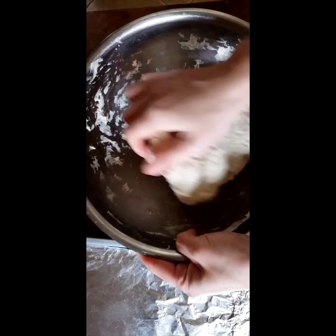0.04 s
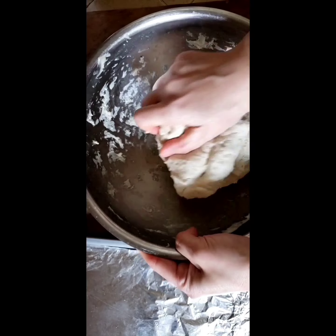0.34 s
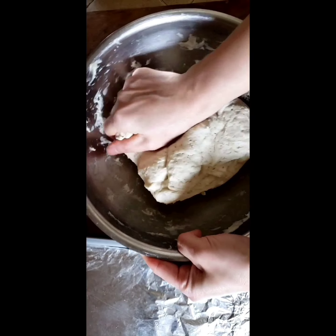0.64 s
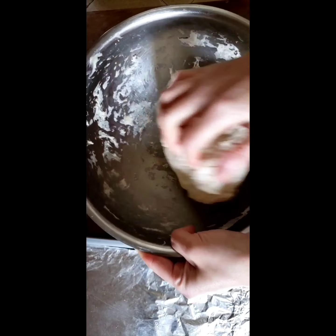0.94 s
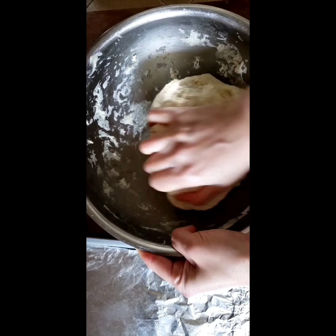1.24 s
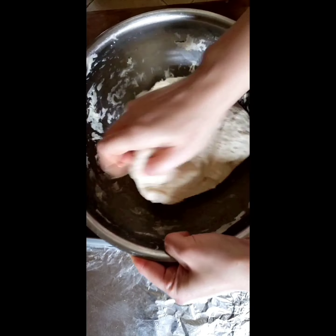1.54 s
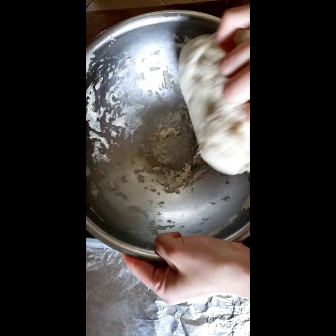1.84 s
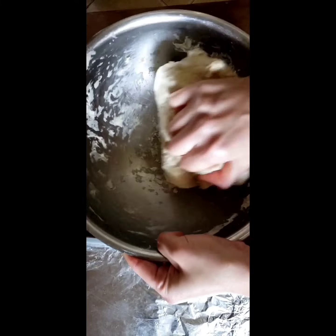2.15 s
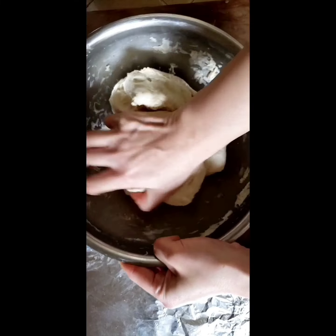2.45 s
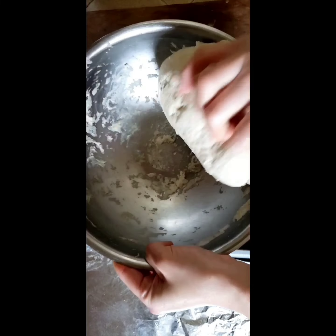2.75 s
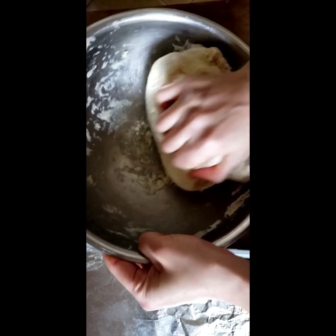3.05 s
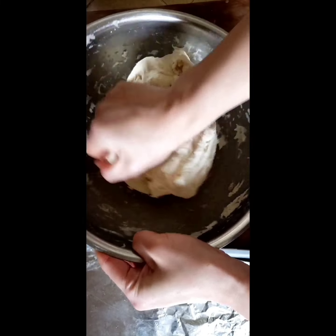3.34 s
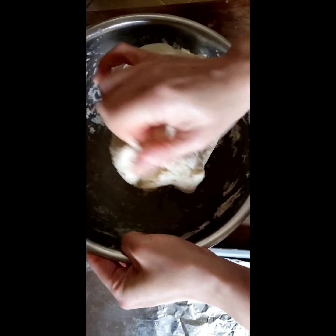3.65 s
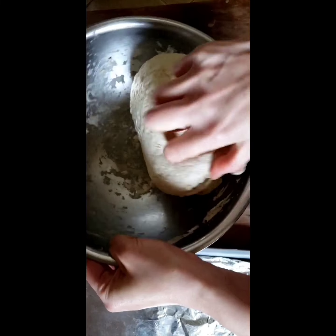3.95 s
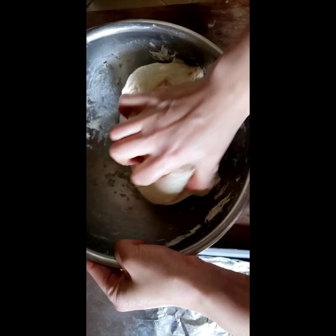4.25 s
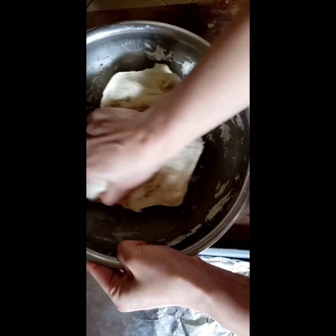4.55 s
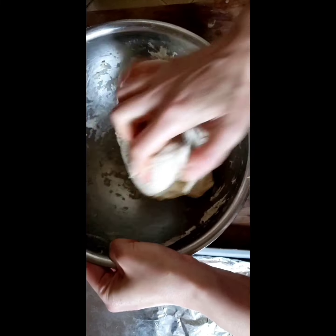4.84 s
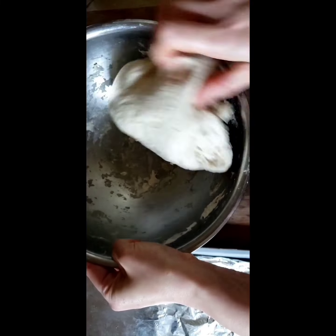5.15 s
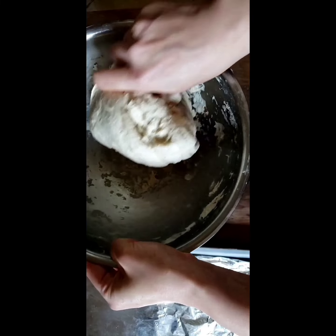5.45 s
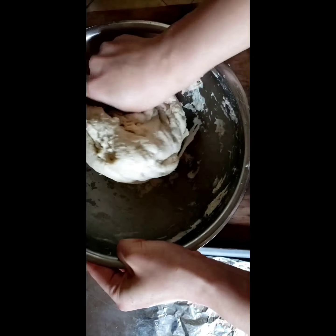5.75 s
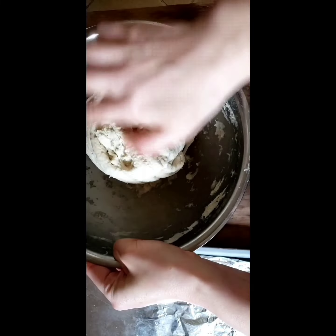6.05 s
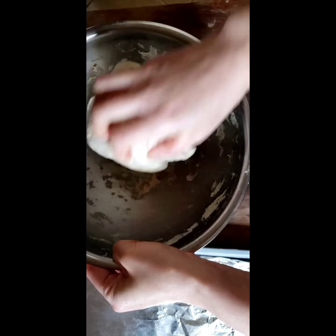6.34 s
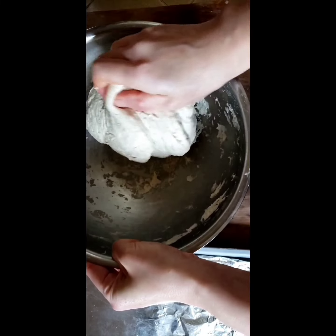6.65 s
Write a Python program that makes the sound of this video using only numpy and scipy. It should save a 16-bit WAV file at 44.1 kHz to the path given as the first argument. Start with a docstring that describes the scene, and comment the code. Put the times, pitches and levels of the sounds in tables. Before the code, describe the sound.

A steel bowl rocks, clanks and thumps on a kitchen counter as a hand pushes and rubs soft dough around inside it.

```python
"""Soft rubbing and a low rumble, close by: a hand kneads dough in a steel bowl on a floury wooden counter.
Strokes drag the dough over floury steel; damp skin and dough stick, slip and squeak.
Pushes tip the bowl: the wall taps as it rocks, the base knocks down and rings, the counter thumps.
Trapped air pops and whistles faintly. A faint kitchen drone lies underneath."""
import sys
import numpy as np
from scipy import signal
from scipy.fft import rfft, irfft, next_fast_len
from scipy.io import wavfile
from scipy.ndimage import uniform_filter1d, map_coordinates

SR = 44100
rng = np.random.default_rng(int(sys.argv[2]) if len(sys.argv) > 2 else 0)


def int16_out(signal):
    """Quantize to a 16-bit WAV file."""
    q = np.round(np.clip(np.atleast_2d(signal).T, -1, 1) * 32767)
    wavfile.write(sys.argv[1], SR, q.astype(np.int16))


N = 304290
T = np.arange(SR * 3 // 5) / SR  # time axis of one impact, s

# hand weight on the dough: t/s, level/dB
HAND_PRESSURE = [(0, -63), (.25, -60), (.36, -49.5), (.8, -51), (1.35, -54.5), (1.68, -50), (2.05, -50),
                 (2.65, -54), (3.0, -49.5), (3.55, -55), (4.15, -50.5), (4.5, -68), (4.8, -59.5),
                 (5.2, -54), (5.42, -63.5), (5.7, -56.5), (6.0, -62.5), (6.9, -61)]
# slides over floury steel: t/s, length/s, skin/dB, flour/dB, scrape/dB
HAND_STROKES = [(.44, 0.062, -51.5, -50.5, -50.5), (0.575, 0.14, -59, -66.5, -54),
                (0.908, 0.029, -49, -48, -51.5), (0.993, 0.3, -56.5, -55, -53.5),
                (1.251, 0.14, -50, -50, -50), (1.464, 0.068, -56, -55.5, -68), (1.697, 0.47, -55, -54, -62),
                (1.824, 0.19, -53, -51, -45), (2.445, 0.27, -60, -65.5, -60),
                (2.682, 0.1, -63, -56.5, -61.5), (2.812, 0.19, -63.5, -65, -58),
                (2.955, 0.076, -49.5, -49, -45), (3.286, 0.041, -57.5, -68, -52.5),
                (3.44, 0.39, -73.5, -59.5, -76), (3.631, 0.22, -59, -59.5, -55),
                (3.887, 0.052, -52, -45, -52), (4.606, .06, -66, -67, -62.5),
                (4.843, 0.11, -60, -56.5, -62), (4.966, 0.15, -60.5, -59, -54.5),
                (5.136, 0.13, -57, -55.5, -54), (5.342, 0.041, -67, -63, -71.5),
                (5.535, 0.16, -70, -75, -63.5), (6.189, 0.22, -61, -59, -62),
                (6.774, 0.043, -59, -50, -58.5)]
# stick-slip: t/s, length/s, level/dB, f/Hz
DOUGH_SQUEAKS = [(0.193, 0.087, -68, 3400), (0.31, 0.057, -50, 158), (0.296, 0.048, -56, 403),
                 (0.92, 0.022, -45.5, 330), (2.85, 0.12, -51.5, 167), (1.869, 0.018, -40, 2100),
                 (2.47, 0.061, -59, 2680), (2.99, 0.039, -41, 760), (3.835, 0.024, -49, 754),
                 (5.08, 0.028, -53, 1080), (5.145, 0.039, -55, 830), (5.533, 0.066, -50.5, 173),
                 (5.58, 0.069, -62.5, 670), (6.385, 0.033, -59, 6100)]
# bowl rocks back on its wall: t/s, level/dB, tilt/(dB/oct), contact/s
WALL_TAPS = [(0.611, -27.5, 2.5, 0.0025), (1.031, -39, -3, 0.0058), (1.521, -37.5, 4, 0.0048),
             (1.669, -39, 1, 0.0035), (1.817, -35.5, -3.5, 0.0048), (1.974, -35, 1, 0.003),
             (2.3078, -32.5, 1.5, 0.0017), (2.775, -36, 3, 0.008), (2.907, -44, -6, 0.0018),
             (3.251, -33.5, 0.5, 0.0023), (3.646, -34, -2, 0.012), (4.096, -19, -5.5, .0015),
             (4.578, -41, 2, 0.0021), (4.951, -46.5, 0.5, .002), (5.699, -37.5, 2, .0012),
             (6.191, -49.5, -4, .008)]
# loaded base lands: t/s, level/dB, tilt/(dB/oct), treble edge/Hz, wall peak/Hz, shudder/dB, thump/dB
BASE_KNOCKS = [(1.057, -31.5, -2.5, 696, 141, 4, -30.5), (1.2653, -21.5, -0.5, 8800, 1300, -0.5, -32),
               (1.2888, -26, 0.5, 3030, 1390, 5, -28), (1.8379, -30.5, -2, 4970, 425, 2, -25),
               (1.9864, -21, -0.5, 4760, 1870, 2, -31), (2.733, -44, -1.5, 1200, 292, 4, -60),
               (2.804, -36.5, -9, 1200, 160, -6, -36.5), (3.037, -36, 5, 7000, 1500, 6, -62),
               (3.0725, -16.5, -0.5, 7100, 1530, -0.5, -52), (3.101, -24, 3.5, 2300, 174, 3.5, -24),
               (3.67, -34.5, -4.5, 2000, 386, 9.5, -27.5), (3.9457, -11, -1, 9450, 1020, 4.5, -28),
               (3.9844, -19, -0.5, 7190, 1170, 9, -22.5), (4.097, -18.5, 1, 2000, 366, 11, -16),
               (4.987, -35, 0, 4000, 400, 30, -32), (5.8445, -35, 0, 1480, 257, -5.5, -44.5),
               (6.224, -42.5, 0, 2690, 457, 24, -32), (6.818, -41.5, -1.5, 2000, 455, 2, -34)]
# air pockets burst: t/s, level/dB, f/Hz
AIR_POPS = [(1.1027, -28, 6080), (1.422, -45, 12000), (3.362, -52.5, 12400), (4.169, -48, 11680)]
# air squeezed out: t/s, length/s, level/dB, start f/Hz, end f/Hz
AIR_WHISTLES = [(2.385, .05, -65, 12000, 14300), (2.54, .058, -57, 14300, 12100),
                (2.622, .035, -63, 12700, 12150)]
# steel bowl modes: f/Hz, level/dB, nominal t60/s
BOWL_MODES = [(257, -4, .55), (338, -5, .25), (356, -4, .35), (407, -5, .35), (489, -2, .3), (557, -5, .35),
              (765, -5, .55), (866, -12, .35), (948, -7, .35), (1104, 4, .4), (1280, -9, .3),
              (1353, -12, .3), (1710, -15, .2), (1922, -14, .15), (2304, -23, .2), (2990, -17, .12),
              (4800, -12, .09), (4856, -14, .2), (5507, -26, .15), (6788, -26, .15)]
# counter rumble: f/Hz, level/dB
COUNTER_SPECTRUM = [(20, -25.5), (48, -9), (68, 0.5), (100, -5), (125, -6.5), (162, -5.5), (200, -22),
                    (330, -17), (600, -25.5), (1500, -68)]
# bowl scrape: f/Hz, level/dB
SCRAPE_SPECTRUM = [(100, -32.5), (250, -3.5), (500, -2), (660, 0), (790, -2.5), (1150, -1.5), (1500, -5),
                   (2100, -9), (2700, -10.5), (4000, -19), (8000, -33.5)]
# skin rub: f/Hz, level/dB
SKIN_SPECTRUM = [(500, -35), (1800, -8), (2700, -4), (3800, -2.5), (5200, 0), (7200, -0.5), (8800, -16.5),
                 (15000, -27.5)]
# flour hiss: f/Hz, level/dB
FLOUR_SPECTRUM = [(1000, -34), (4000, -12), (7000, -2), (8700, -6), (10500, 1), (13000, 5.5), (15000, -3)]
# kitchen drone: f/Hz, level/dB
DRONE_SPECTRUM = [(12, -48.5), (20, -26.5), (59, -3.5), (97, -19.5), (160, -2.5), (223, -34.5), (294, -15),
                  (540, -14.5), (656, -39.5), (1170, -49.5), (5690, -53.5), (6720, -26), (8380, -44),
                  (11100, -31), (15000, -56.5)]
# struck wall: f/Hz, level/dB
WALL_SPECTRUM = [(60, -32), (250, -17.5), (355, -7), (470, -30.5), (630, -5.5), (765, 5.5), (900, -10.5),
                 (1110, 5), (1400, -8.5), (2600, -9.5), (3800, -19.5), (6500, -27), (8800, -42.5),
                 (15000, -39.5)]
# struck base: f/Hz, level/dB
BASE_SPECTRUM = [(40, -21.5), (130, 1), (195, -1), (270, -1.5), (560, -2), (690, -3), (830, -5),
                 (1750, -9.5), (2400, -17), (4200, -24.5), (4900, -16.5), (7000, -18.5), (8800, -30),
                 (15000, -27.5)]
# uneven radiation of the bowl: f/Hz, left minus right/dB
BOWL_BALANCE = [(100, 0.5), (250, 0), (520, 3), (1050, 0), (1900, 2), (5000, 2.5), (9000, 1.5)]
# left-right likeness: f/Hz, coherence/1
COHERENCE = [(100, 0.96), (300, 0.83), (550, 0.76), (1000, 0.14), (2000, .1), (5000, 0.078), (12000, 0)]
# kitchen reverberation: f/Hz, t60/s
ROOM_DECAY = [(100, 0.57), (400, 0.26), (1500, 0.3), (5000, 0.46), (12000, 0.083)]


def amp(db):
    """dB to gain."""
    return 10 ** (np.asarray(db) / 20)


def unit(x):
    """Scale to rms 1."""
    return x / np.sqrt(np.mean(x ** 2) + 1e-20)


def unit_energy(x):
    """Scale to the energy of 10 ms at rms 1."""
    return unit(x) * np.sqrt(SR / 100 / x.shape[-1])


def along(points, hz):
    """Interpolate (f/Hz, value) points on a log axis."""
    points_hz, values = np.transpose(points)
    return np.interp(np.log(hz + 1), np.log(points_hz + 1), values)


def resonance(hz, centre_hz, width):
    """Peak of height 1; width relative to the centre."""
    return 1 / (1 + ((hz - centre_hz) / (width * centre_hz)) ** 2)


def add(track, start_s, sound):
    """Mix in at start_s."""
    part = track[:, round(start_s * SR):][:, :sound.shape[-1]]
    part += sound[..., :part.shape[-1]]


def wobble(rate_hz):
    """Random knots joined by lines."""
    knots = rng.standard_normal(int(N * rate_hz / SR) + 4)
    return map_coordinates(knots, [np.arange(N) * rate_hz / SR], order=1)


def filtered(x, response):
    """FFT filter by response(hz)."""
    n = x.shape[-1]
    size = next_fast_len(n + SR // 10)
    return irfft(rfft(x, size) * response(np.fft.rfftfreq(size, 1 / SR)), size)[..., :n]


def struck(x, gain, size=4096):
    """Drive a minimum-phase body of magnitude gain(hz)."""
    cepstrum = irfft(np.log(np.maximum(gain(np.fft.rfftfreq(size, 1 / SR)), 1e-6)))
    cepstrum[1:size // 2] *= 2
    cepstrum[size // 2 + 1:] = 0
    impulse_response = irfft(np.exp(rfft(cepstrum)))
    return signal.fftconvolve(x, impulse_response[None], axes=1)[:, :x.shape[-1]]


def spread_rad(hz):
    """Mid-side angle for the coherence at hz."""
    return np.arccos(np.clip(along(COHERENCE, hz), -1, 1)) / 2


def diffuse(n):
    """White stereo noise: coherent bass, unrelated treble."""
    weights = lambda hz: np.array([np.cos(spread_rad(hz)), np.sin(spread_rad(hz))])
    mid, side = filtered(rng.standard_normal((2, n)), weights)
    return np.array([mid + side, mid - side])


def rush(spectrum, patchy_db):
    """Coloured stereo noise, rms 1, with random time-frequency patches of gain."""
    bins = signal.stft(diffuse(N), nperseg=1024)[2]
    patches = uniform_filter1d(rng.standard_normal(bins.shape[1:]), size=5, axis=0)
    patches = uniform_filter1d(patches, size=6, axis=1)
    noise = signal.istft(bins * amp(patchy_db * unit(patches)), nperseg=1024)[1][:, :N]
    return unit(filtered(noise, lambda hz: amp(along(spectrum, hz))))


def friction(push_db, attack_tau_s=0.012, release_tau_s=0.042, arch_db=1.5):
    """Skin, flour and scrape gains: light cling following the push, plus arched strokes."""
    t = np.arange(N) / SR
    cling_db = [[-17.5], [-15.5], [-16]]
    power = (amp(cling_db) * amp(push_db)) ** 2
    for start_s, length_s, *levels_db in HAND_STROKES:
        before = np.maximum(start_s - t, 0) / attack_tau_s
        after = np.maximum(t - start_s - length_s, 0) / release_tau_s
        fade = np.exp(-np.minimum(before + after, 20))
        position = np.clip(2 * (t - start_s) / length_s - 1, -1, 1)
        arch = amp(arch_db * (.5 - position ** 2))
        power += np.outer(amp(levels_db), arch * fade) ** 2
    return np.sqrt(power)


def crackle(rate_hz):
    """Threads of wet dough snap at random times and sizes."""
    impulses = (rng.random(N) < rate_hz / SR) * rng.standard_normal(N)
    snap = rng.standard_normal((2, 256)) * np.exp(-T[:256] / 0.0013)
    snaps = signal.fftconvolve(impulses[None], snap, axes=1)[:, :N]
    return unit(filtered(snaps, lambda hz: amp(along(SKIN_SPECTRUM, hz))))


def kneading():
    """Pressure rumbles through the counter; steel, skin and flour rub in tiny slips."""
    push_db = np.interp(np.arange(N) / SR, *np.transpose(HAND_PRESSURE))
    skin_gain, flour_gain, scrape_gain = friction(push_db)
    slips_db = 1.2 * wobble(rate_hz=45) + 1.2 * wobble(rate_hz=600)
    push = amp(push_db) * rush(COUNTER_SPECTRUM, patchy_db=1.0)
    scrape = scrape_gain * rush(SCRAPE_SPECTRUM, patchy_db=5.0)
    skin = skin_gain * (rush(SKIN_SPECTRUM, patchy_db=5.5) + amp(-15) * crackle(rate_hz=100))
    flour = flour_gain * rush(FLOUR_SPECTRUM, patchy_db=.3) * amp([[-.9], [.9]])  # slightly right
    return push + amp(slips_db) * (scrape + skin) + amp(.6 * slips_db) * flour


def drone():
    """Faint kitchen background."""
    return amp(-65) * rush(DRONE_SPECTRUM, patchy_db=3.0)


def squeaks():
    """Damp skin and dough stick and slip on steel: narrow noise bands with soft ends."""
    out = np.zeros((2, N))
    for start_s, length_s, db, pitch_hz in DOUGH_SQUEAKS:
        n = round(length_s * SR)
        band = unit(filtered(diffuse(n), lambda hz: resonance(hz, pitch_hz, width=0.156)))
        add(out, start_s, amp(db) * band * signal.windows.tukey(n, 0.33))
    return out


def chatter(t60_s, rise_s):
    """Dense, damped shudder of thin steel under dough."""
    return unit_energy(diffuse(len(T)) * amp(-60 * T / t60_s) * (1 - np.exp(-T / rise_s)))


def room_tail():
    """Fresh kitchen reverberation; each band has its own decay."""
    hz, t, bins = signal.stft(diffuse(len(T)), SR, nperseg=256)
    decay = amp(-60 * t / along(ROOM_DECAY, hz)[:, None])
    return unit_energy(signal.istft(bins * decay, SR, nperseg=256)[1][:, :len(T)])


def ring(damping, settle_s):
    """Bowl modes at random strengths, phased apart left and right, choked by settling dough."""
    hz, db, t60_s = np.transpose(BOWL_MODES)[:, :, None]
    strength = amp(db + 1.2 * rng.standard_normal(hz.shape))
    offset_rad = spread_rad(hz) * rng.choice([-1, 1], hz.shape)
    modes = strength * np.exp((2j * np.pi * hz - np.log(1000) * damping / t60_s) * T)
    pair = np.array([(modes * np.exp(1j * side * offset_rad)).imag.sum(0) for side in (1, -1)])
    attack = 1 - np.exp(-T / 0.00043)
    choke = np.exp(-(T / settle_s) ** 2)
    return unit_energy(pair * attack * choke)


def taps():
    """Light wall contacts buzz without a thump; longer ones scuff."""
    out = np.zeros((2, N))
    for start_s, db, tilt_db_oct, contact_s in WALL_TAPS:
        contact = chatter(t60_s=.027 + 9 * contact_s, rise_s=contact_s) + amp(-9.5) * room_tail()
        wall = lambda hz: amp(along(WALL_SPECTRUM, hz) + tilt_db_oct * np.log2((hz + 200) / 1200))
        buzz = unit_energy(struck(contact, wall))
        add(out, start_s, amp(db) * (buzz + amp(-12) * ring(damping=2.1, settle_s=0.022)))
    return out


def slap(dispersion):
    """Bending waves in steel carry the treble ahead of the bass."""
    impulse = signal.unit_impulse(len(T))
    return unit_energy(filtered(impulse, lambda hz: np.exp(-1j * dispersion * np.sqrt(hz))))


def knocks(free_ring_db=-1, held_ring_db=-19, jump_db=-12, ring_slope=1.8):
    """The base slaps the counter; hard knocks free the bowl from the hand, so it rings more."""
    out = np.zeros((2, N))
    for start_s, db, tilt_db_oct, edge_hz, wall_hz, shudder_db, thump_db in BASE_KNOCKS:
        # many contact points within a few ms
        landing = unit_energy(slap(dispersion=.2) + amp(-1) * chatter(t60_s=.018, rise_s=.0005))
        contact = unit_energy(landing + amp(shudder_db) * chatter(t60_s=0.079, rise_s=0.0006))
        contact += amp(-10.5) * room_tail()

        def body(hz):
            """Base response; the dough's position sets which part of the wall resonates."""
            wall_db = 9 * resonance(hz, wall_hz, width=0.13)
            tilt_db = tilt_db_oct * np.log2((hz + 200) / 800)
            return amp(along(BASE_SPECTRUM, hz) + wall_db + tilt_db) / np.sqrt(1 + (hz / edge_hz) ** 6)

        knock = unit_energy(struck(contact, body))
        ring_db = np.clip(free_ring_db + ring_slope * (db - jump_db), held_ring_db, free_ring_db)
        add(out, start_s, amp(db) * (knock + amp(ring_db) * ring(damping=0.87, settle_s=0.14)))
        add(out, start_s, amp(thump_db) * thump())
    return filtered(out, lambda hz: amp(np.outer([.5, -.5], along(BOWL_BALANCE, hz))))


def thump(delay_s=0.01, rise_s=0.0025, bounce_t60_s=0.27, sway_t60_s=0.65):
    """The counter bounces, sways and rumbles under the dough's weight."""
    load = 1 + .03 * rng.standard_normal()
    bounce_hz, sway_hz = 99 / load, 72 / load
    t = np.maximum(T - delay_s, 0)
    bounce = np.sin(2 * np.pi * bounce_hz * t) * amp(-60 * t / bounce_t60_s)
    sway = np.sin(2 * np.pi * sway_hz * t) * amp(-13.5 - 60 * t / sway_t60_s)
    rumble = struck(chatter(t60_s=0.41, rise_s=0.008), lambda hz: amp(along(COUNTER_SPECTRUM, hz)))
    return (bounce + sway) * (1 - np.exp(-t / rise_s)) + amp(-7.5) * unit_energy(rumble)


def pops():
    """Air pockets burst: tiny bright pings bounce around the bowl."""
    out = np.zeros((2, N))
    for start_s, db, pitch_hz in AIR_POPS:
        burst = slap(dispersion=.05) + amp(-4) * chatter(t60_s=.032, rise_s=.002)
        burst += amp(-21) * room_tail()
        ping = lambda hz: resonance(hz, pitch_hz, width=0.23) ** 2
        cavity = lambda hz: ping(hz) + resonance(hz, centre_hz=600, width=0.32) + amp(-34.5)
        add(out, start_s, amp(db) * unit_energy(struck(burst, cavity)))
    return out


def whistles(bend=1.8, jitter_hz=130):
    """Escaping air: thin, unsteady tones glide as the gap narrows or opens."""
    out = np.zeros((2, N))
    for start_s, length_s, db, first_hz, last_hz in AIR_WHISTLES:
        progress = np.linspace(0, 1, round(length_s * SR))
        below_top = progress if first_hz > last_hz else 1 - progress
        glide_hz = max(first_hz, last_hz) - abs(last_hz - first_hz) * below_top ** bend
        hz = glide_hz + jitter_hz * wobble(rate_hz=900)[:len(progress)]
        envelope = np.sqrt(np.abs(np.sin(np.pi * progress)))
        add(out, start_s, amp(db) * envelope * np.sin(2 * np.pi * np.cumsum(hz) / SR))
    return out


def scene():
    """Bowl and dough over the kitchen drone."""
    return knocks() + taps() + pops() + squeaks() + whistles() + kneading() + drone()


def record(dry):
    """Soft peak limit, then brick-wall low-pass."""
    ceiling, cutoff_hz = .95, 14850
    limited = dry / (1 + np.abs(dry / ceiling) ** 4) ** (1 / 4)
    return filtered(limited, lambda hz: hz < cutoff_hz)


dry = scene()
out = record(dry)
int16_out(out)
```